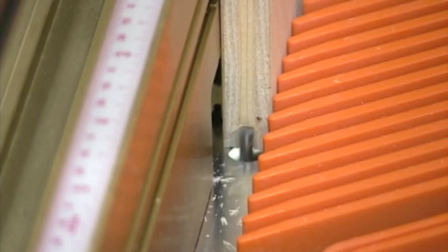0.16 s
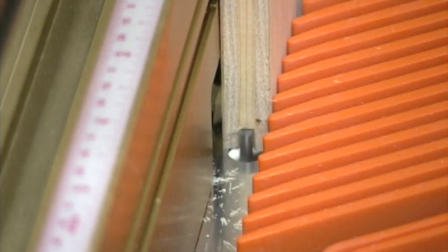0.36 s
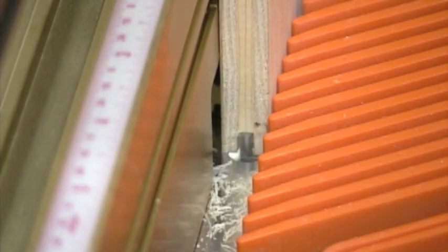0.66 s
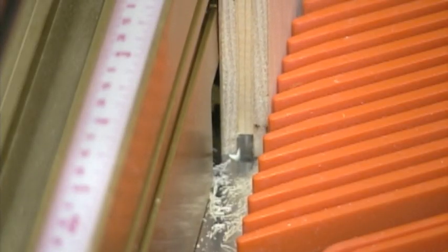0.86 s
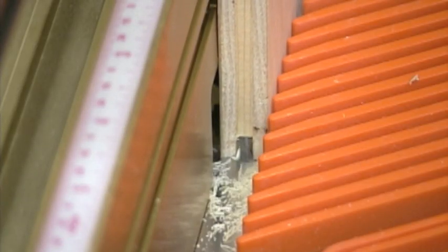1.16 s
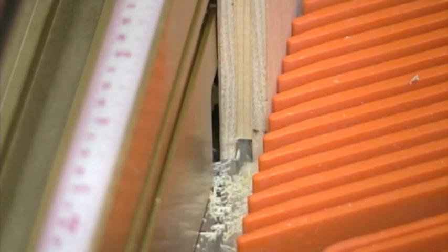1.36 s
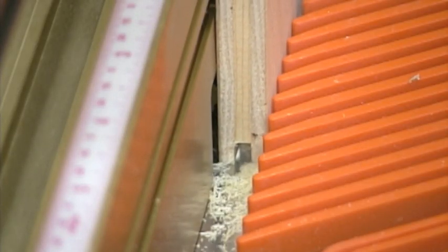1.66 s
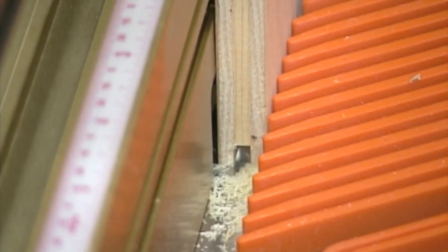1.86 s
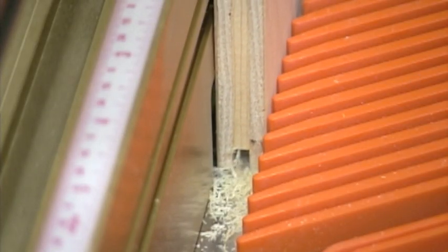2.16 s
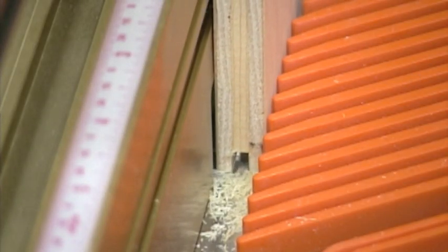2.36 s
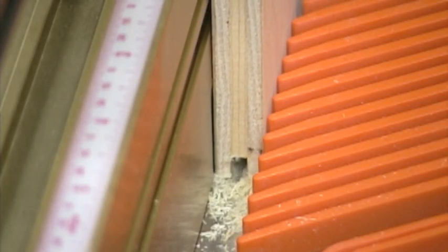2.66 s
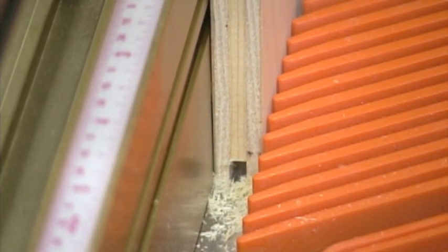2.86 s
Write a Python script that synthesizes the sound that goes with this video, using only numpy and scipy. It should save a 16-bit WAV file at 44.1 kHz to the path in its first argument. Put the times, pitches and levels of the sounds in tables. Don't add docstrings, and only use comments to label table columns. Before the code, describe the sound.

A table router idles with a soft hiss, then cracks into plywood with a loud, rough whine

```python
import sys
import numpy as np
from scipy import signal
from scipy.fft import rfft, irfft, next_fast_len
from scipy.io import wavfile
from scipy.ndimage import uniform_filter1d

SR = 44100
rng = np.random.default_rng(int(sys.argv[2]) if len(sys.argv) > 2 else 0)


def invert_db(x):
    u = np.asarray(x, float) / 20
    return 10 ** u


def unload_wav(signal):
    wavfile.write(
        sys.argv[1],
        SR,
        np.round(np.clip(np.atleast_2d(signal).T, -1, 1) * 32767).astype(np.int16),
    )


N = 132300
T = np.arange(N) / SR
SLOW = T[::128]
BITE_S = .1145

# time_s, effort_db, board_grab_db
FEED = [(.12, -12.5, -2), (.24, -16.5, -2), (.38, -16.5, -1), (.6, -15.5, 1), (.84, -16.5, -2.5),
        (.94, -20, -4.5), (1.04, -17, -2), (1.22, -16.5, -4.5), (1.27, -15.5, -3.5), (1.33, -16.5, -4.5),
        (1.5, -15.5, -1.5), (1.77, -18.5, 2), (1.84, -20.5, 0), (1.92, -17, 2.5), (2.25, -16.5, -4),
        (2.45, -16.5, 0), (2.76, -19.5, -0.5), (3, -18, -1)]
# time_s, speed_hz, depth_0_to_1
SHAFT = [
    (0, 163.4, 0),
    (.14, 163.3, 0),
    (.4, 162.55, 0),
    (.62, 162, .3),
    (.84, 161.3, .5),
    (1, 160.95, .5),
    (1.3, 160.7, .5),
    (1.9, 160.45, .68),
    (2.5, 160.6, 1),
    (3, 161, 1),
]
# time_s, level_db
PLY_TEARING = [(.12, -30), (.38, -32), (.54, -28), (.7, -24), (.86, -24), (.98, -27), (1.1, -23),
               (1.2, -27), (1.34, -30), (1.56, -26), (1.76, -23), (1.84, -26), (2.14, -23.5), (2.38, -27),
               (2.55, -25), (2.76, -22), (2.88, -27), (3, -26)]
TIP_ORDERS = [-45, -18, -20, -21, -18, -21, -8, -18, -19, -21, -14, -18, -20, -13, 0, -3, -8, -8, -8, -17,
              -13, -20, -16, -17, -15, -10, -15, -6, -8, -5, -5, -13, -12, -12, -17, -14, -18, -19, -19,
              -22, -25, -25, -23, -21]
HALF_ORDERS = [-45, -7, -12, -7, -5, -15, -10, -11, -9, -12, -7, -17, -16, -13, -13, -5, -12, -14, -14, -12,
               -14, -15, -12, -22, -17, -14, -10, -11, -13, -13, -8, -8, -18, -12, -17, -13, -18, -21, -21,
               -20, -23, -28, -20, -19]
BURIED_ORDERS = [-45, -4, -11, -6, -7, -15, -13, -12, -5, -15, -7, -21, -20, -16, -14, -9, -13, -13, -18,
                 -11, -13, -19, -16, -27, -18, -12, -12, -15, -20, -18, -12, -15, -23, -17, -22, -19, -21,
                 -24, -24, -23, -26, -31, -23, -22]
# time_s, pitch_hz, level_db
GROOVE_RING = [
    (.15, 2450, -4),
    (.3, 2500, 2),
    (.4, 2550, 1),
    (.52, 2900, 7),
    (.66, 3050, 8),
    (.72, 2700, 2),
    (.76, 2600, 4),
    (.84, 2600, 0),
]
# start_s, length_s, pitch_hz, width_hz,
# level_db
SINGING_SPELLS = [(0.122, 0.18, 2737, 220, -4.5), (0.127, .15, 4450, 260, 1), (0.136, 0.83, 322, 99, -1.5),
                  (0.223, 0.11, 3500, 300, -9), (0.254, 0.14, 4880, 150, 1.5),
                  (0.354, 0.33, 1449, 220, -13), (.37, 0.28, 3381, 220, 4), (.41, 0.82, 5152, 220, -4.5),
                  (0.526, 0.87, 2415, 150, -5.5), (0.42, 0.3, 4669, 224, -3), (0.513, 0.2, 1127, 100, 6),
                  (0.604, 0.44, 4508, 180, 6), (.725, 0.031, 2576, 150, 7), (.79, .56, 3220, 100, 3),
                  (1.027, .17, 2576, 100, 5), (.15, 1.2, 966, 101, -6), (1.025, 0.31, 1400, 200, 5.5),
                  (1.07, 0.17, 5957, 220, -3), (1.114, 1.95, 1932, 101, -17), (1.254, 0.047, 1800, 294, 10),
                  (1.248, 0.037, 860, 450, 5.5), (0.754, 0.14, 1560, 350, 3), (1.28, 0.76, 2737, 219, -6),
                  (1.408, 0.51, 2415, 100, 4), (1.46, 1.07, 1127, 224, -9), (1.3, 0.33, 5152, 150, 1.5),
                  (1.3, 1.4, 483, 97, -1.5), (1.4, 0.65, 8050, 100.6, 7), (1.605, 0.77, 5313, 220, -8),
                  (1.63, 0.68, 4991, 100, 5), (1.67, 0.42, 3381, 100, 2.5), (2.021, 0.12, 720, 200, 5),
                  (2.09, .16, 2254, 220, -10), (2.226, 0.022, 2576, 200, 10), (2.33, 0.12, 2737, 220, 7),
                  (2.353, 0.12, 4347, 100, 8.5), (2.417, 0.5, 4991, 220, -18),
                  (2.596, 0.54, 2737, 453, -6.5), (2.456, .6, 1449, 100, 3.5), (2.67, .3, 1771, 100, 5)]
# pitch_hz, width_hz, level_db
TIP_TEAR = [(1280, 110, -24), (2350, 120, 2.5), (3260, 430, -13), (4440, 1200, 2.5), (5100, 220, -26),
            (6500, 530, -9)]
# pitch_hz, width_hz, level_db
BURIED_TEAR = [(466, 49, 1), (685, 290, -3), (1045, 153, -1.5), (1255, 160, 1.5), (1723, 190, 1),
               (2394, 204, 1), (3270, 670, -9), (4260, 970, -6), (5850, 470, -18)]
# pitch_hz, width_hz, level_db
CHATTER_PEAKS = [(2380, 150, 0), (2560, 130, 0)]
# pitch_hz, density_db_per_hz
CHIP_BED = [(120, -66), (200, -79), (314, -8), (402, -10), (641, -4), (721, -58), (2490, 19.5), (6500, -5),
            (8450, -71), (14300, -120)]
# pitch_hz, density_db_per_hz
FIBRE_FIZZ = [(3500, -18), (5000, -0.5), (6700, -7.5), (8100, -6.5), (11500, -10), (13000, -24),
              (14200, -41), (15600, -67)]
# pitch_hz, density_db_per_hz
BITE_SPLINTERS = [(880, -55), (1500, -20), (2310, -23), (2520, -18), (3890, -3), (4590, 3), (10300, -28),
                  (15000, -45)]
# pitch_hz, density_db_per_hz
FAN_AND_BRUSHES = [(130, -15), (200, -18), (350, 0), (700, 1), (1900, 0.5), (3000, -5.5), (5000, -16.5),
                   (12000, -20.5), (15500, -26)]
# pitch_hz, level_db
HOUSING_LINES = [(281, -57.5), (358, -47), (710, -48), (1001, -48)]
# pitch_hz, likeness_0_to_1
LIKENESS = [(150, 0.33), (320, 1), (1000, 0.6), (5000, 0.85), (9000, .5), (15000, 0.15)]
# pitch_hz, level_db
PORT_LEAN = [(100, -11), (160, 12), (300, 1.5), (1000, -1.5), (8000, -1.1), (15000, -2)]
# pitch_hz, lead_rad
PORT_LEAD = [(150, -1.55), (320, -1.47), (700, -0.9), (2000, -0.37), (6000, -0.29), (12000, -0.62)]


def unit(x):
    return x / np.sqrt(np.mean(x ** 2) + 1e-20)


def along(points, hz):
    f, v = np.transpose(points)
    return np.interp(np.log(hz + 1), np.log(f + 1), v)


def curves(rows):
    s, *cols = np.transpose(rows)
    return [np.interp(T, s, c) for c in cols]


def wobble(rate, count=1, t=T):
    knots = rng.standard_normal((count, int(N * rate / SR) + 4))
    return np.array([np.interp(t * rate, np.arange(len(k)), k) for k in knots])


def filtered(x, response):
    m = next_fast_len(N + SR // 2)
    return irfft(rfft(x, m) * response(np.fft.rfftfreq(m, 1 / SR)), m)[..., :N]


def coloured(x, spectrum):
    return unit(filtered(x, lambda hz: invert_db(along(spectrum, hz))))


def resonant(x, peaks):
    def response(f):
        total = 0
        for k, (centre, width, db) in enumerate(peaks):
            damping = 1j * f * width
            total = total + (-1) ** k * invert_db(db) * damping / (centre * centre - f * f + damping)
        return total
    return unit(filtered(x, response))


def pair(patchy_db):
    z = signal.stft(rng.standard_normal((2, N)), nperseg=512)[2]
    patches = uniform_filter1d(rng.standard_normal(z.shape[1:]), size=5, axis=0)
    patches = uniform_filter1d(patches, size=10, axis=1)
    two = signal.istft(z * invert_db(patchy_db * unit(patches)), nperseg=512)[1][:, :N]

    def mid_side(hz):
        turn = np.arccos(np.clip(along(LIKENESS, hz), 0, 1)) / 2
        return np.array([np.cos(turn), np.sin(turn)])
    mid, side = filtered(two, mid_side)
    return np.array([mid + side, mid - side])


def shaft():
    speed, depth = curves(SHAFT)
    return 2 * np.pi * np.cumsum(speed) / SR, depth


def table():
    lumps = rng.standard_normal((2, N)) * invert_db(5 * wobble(20))
    rumble = invert_db(-63) * coloured(lumps, [(15, -20), (28, 7), (130, 4), (220, -51)])
    since = np.maximum(T - BITE_S, 0)
    jolt_db, jolt_hz, jolt_t60_s = -40, 30, .25
    jolt = invert_db(jolt_db - 60 * since / jolt_t60_s) * np.sin(2 * np.pi * jolt_hz * since)
    return rumble + jolt


def shop(x):
    t60_s = .3
    tail = rng.standard_normal((2, SR // 2)) * invert_db(-60 * T[:SR // 2] / t60_s)
    return signal.fftconvolve(x, tail / np.linalg.norm(tail[0]), axes=1)[:, :N]


def motor():
    angle, _ = shaft()
    bars, mains_buzz_hz = 12, 237
    commutator_db = -27.5 + .67 * wobble(56)[0] - 10 * (T > BITE_S)
    lines = invert_db(commutator_db) * np.sin(bars * angle) + invert_db(-53) * np.sin(angle)
    lines = lines + invert_db(-53 + 7.6 * wobble(4.63)[0]) * np.sin(2 * np.pi * mains_buzz_hz * T)
    for hz, db in HOUSING_LINES:
        lines = lines + invert_db(db + 1.6 * wobble(14)[0]) * np.sin(2 * np.pi * hz * T)
    return invert_db(-26.5) * coloured(pair(patchy_db=2.5), FAN_AND_BRUSHES) + lines


def chatter(chips, tear_db):
    from_s, fade_s = .7, .05
    lumps = unit(invert_db(5 * wobble(28)[0])) * np.clip((T - from_s) / fade_s, 0, 1)
    return invert_db(-7 + tear_db) * lumps * resonant(resonant(chips, CHATTER_PEAKS), CHATTER_PEAKS)


def splinters(burst, since):
    t60_s = .4
    return invert_db(-21 - 60 * since / t60_s) * coloured(burst * pair(patchy_db=-5.0), BITE_SPLINTERS)


def fizz(burst, effort_db, depth, tear_db):
    level_db = 1.2 * (effort_db - effort_db.mean()) - .73 * depth + .077 * (tear_db - tear_db.mean())
    return invert_db(-27.5) * coloured(burst * pair(patchy_db=4.0), FIBRE_FIZZ) * invert_db(level_db)


def tearing(burst, chips, depth, grab_db, tear_db):
    tip = (1 - depth) * resonant(chips, TIP_TEAR)
    buried = 2.6 * depth * invert_db(grab_db / 2) * resonant(chips, BURIED_TEAR)
    bed = 1.1 * coloured(burst * pair(patchy_db=1.0), CHIP_BED)
    return invert_db(-2.5 + tear_db) * (tip + buried + bed)


def singing(hz):
    s, length, centre_hz, wide_hz, db = np.transpose(SINGING_SPELLS)[..., None]
    edge_s = .015
    spell = np.clip(np.minimum(SLOW - s, s + length - SLOW) / edge_s + .5, 0, 1)
    return np.sum(db * spell * np.exp(-((hz - centre_hz) / wide_hz) ** 2), axis=0)


def order_levels():
    count = 72 - len(BURIED_ORDERS)
    high = -23 - .4 * np.arange(count) + 1.5 * rng.standard_normal(count)
    depths = [np.r_[TIP_ORDERS, high], np.r_[HALF_ORDERS, high], np.r_[BURIED_ORDERS, high - 8]]
    return invert_db(np.array(depths).T)


def whine(angle, depth, grab_db):
    out = np.zeros((2, N))
    levels = order_levels()
    lurch = (.002 * wobble(30)[0] + .0012 * wobble(140)[0]) * (.5 + depth)
    lag = np.cumsum(rng.normal(0, 2.2, len(levels)))
    apart = rng.normal(0, .2, len(levels))
    groove_hz, groove_db, depth, grab_db = [np.interp(SLOW, T, c)
                                            for c in [*curves(GROOVE_RING), depth, grab_db]]
    board_hz, groove_wide_hz = 1900, 260
    for k, level in enumerate(levels):
        hz = (k + 1) * SHAFT[-1][1]
        loose = min(1, k / 4) * (.6 + .5 * depth)
        drift_db = 4 if k >= len(BURIED_ORDERS) else 1
        swell_db = loose * (drift_db * wobble(5, t=SLOW)[0] + 2.4 * wobble(22, t=SLOW)[0])
        swell_db = swell_db + singing(hz) + grab_db * (2 < k and hz < board_hz)
        if board_hz < hz < 2 * board_hz:
            nearness = np.exp(-((hz - groove_hz) / groove_wide_hz) ** 2)
            swell_db = swell_db + groove_db * (1.5 * nearness - .5)
        size = np.interp(T, SLOW, np.interp(depth, [0, .5, 1], level) * invert_db(swell_db))
        drift = np.interp(T, SLOW, .22 * loose * wobble(14, t=SLOW)[0])
        phase = (k + 1) * (angle + lurch) + drift + lag[k]
        out += size * np.cos(apart[k]) * np.sin(phase)
        out += np.outer([1, -1], size * np.sin(apart[k]) * np.cos(phase))
    return out


def cutter():
    angle, depth = shaft()
    effort_db, grab_db = curves(FEED)
    tear_db, = curves(PLY_TEARING)
    burst = np.exp(.25 * np.cos(angle) + .35 * np.cos(2 * angle + 1.1)) * invert_db(.8 * wobble(40)[0])
    chips = burst * pair(patchy_db=1.5)
    since = np.maximum(T - BITE_S, 0)
    rise_s = .003
    cut = invert_db(effort_db - 2) * whine(angle, depth, grab_db)
    cut = cut + tearing(burst, chips, depth, grab_db, tear_db)
    cut = cut + fizz(burst, effort_db, depth, tear_db)
    cut = cut + splinters(burst, since) + chatter(chips, tear_db)
    return (1 - np.exp(-since / rise_s)) * cut


def ports(x):
    notch_hz, notch_wide_hz, notch_keeps, low_cut_hz = 3900, 460, .18, 150

    def response(f):
        stiff, damping = notch_hz ** 2 - f * f, 1j * f * notch_wide_hz
        dip = (stiff + damping * notch_keeps) / (stiff + damping)
        half = invert_db(along(PORT_LEAN, f) / 2) * np.exp(.5j * along(PORT_LEAD, f))
        return dip * np.array([half, 1 / half]) / np.sqrt(1 + (low_cut_hz / (f + 1)) ** 20)
    return filtered(x, response)


def scene():
    cut = cutter()
    return ports(cut + invert_db(-18) * shop(cut) + motor()) + table()


def top_cut(x):
    return signal.sosfilt(signal.butter(12, 15760, fs=SR, output="sos"), x)


def record(dry):
    top = 1.1
    mix = dry / (1 + np.abs(dry / top) ** 6) ** (1 / 6)
    return top_cut(mix)


dry = scene()
out = record(dry)
unload_wav(out)
```